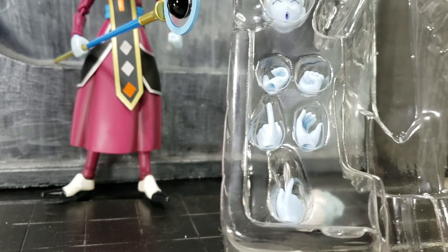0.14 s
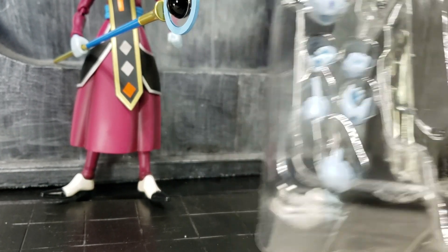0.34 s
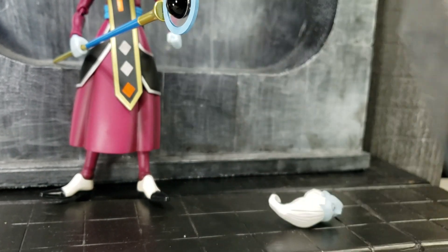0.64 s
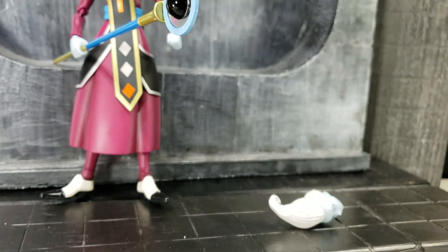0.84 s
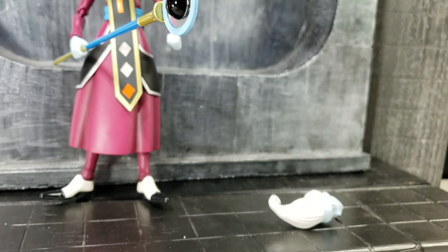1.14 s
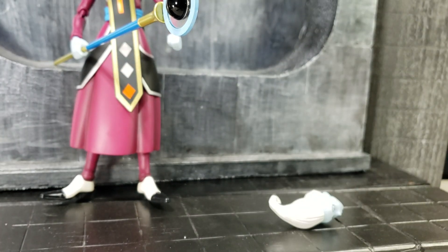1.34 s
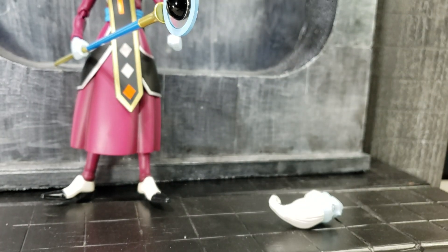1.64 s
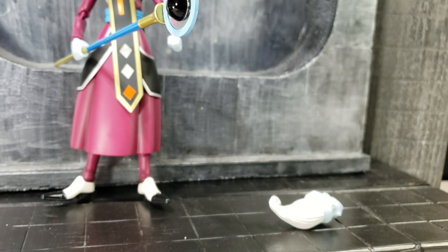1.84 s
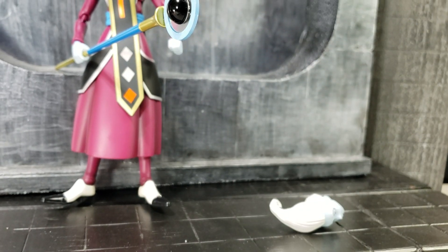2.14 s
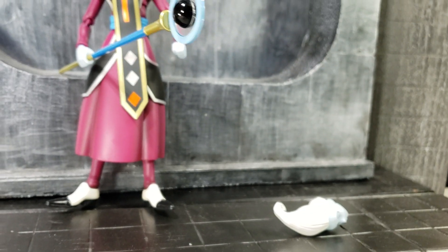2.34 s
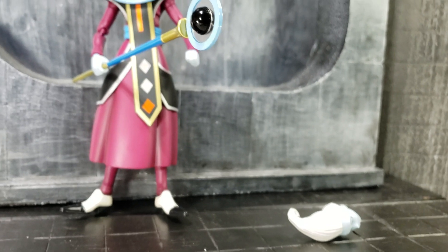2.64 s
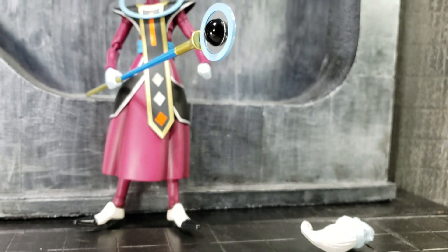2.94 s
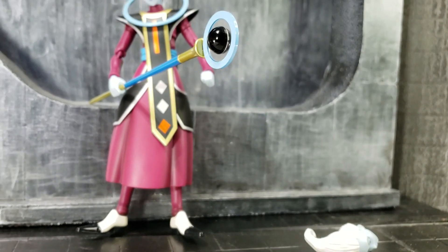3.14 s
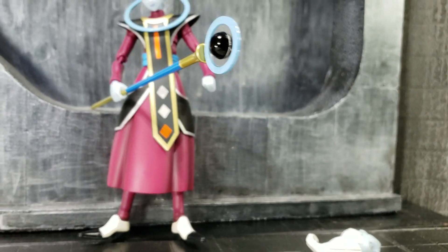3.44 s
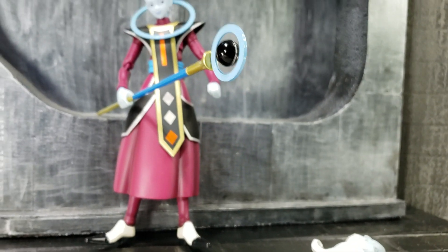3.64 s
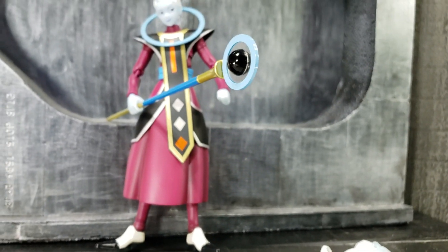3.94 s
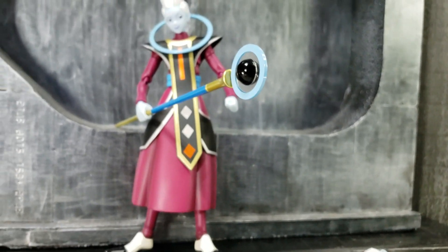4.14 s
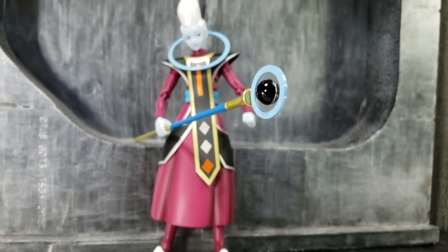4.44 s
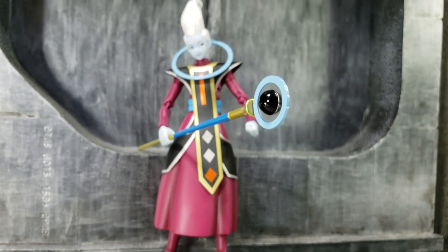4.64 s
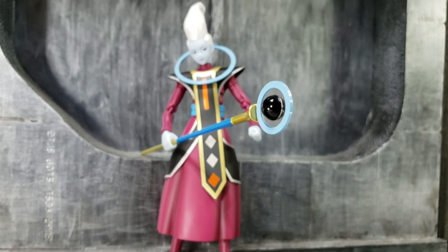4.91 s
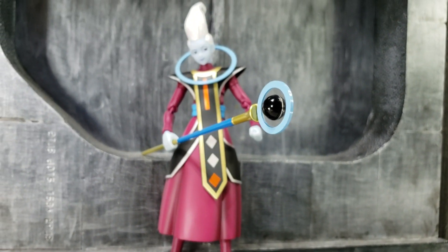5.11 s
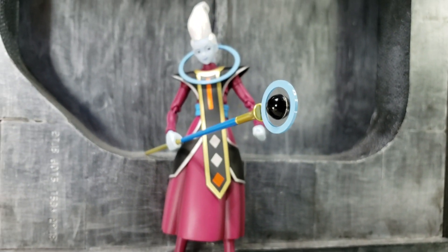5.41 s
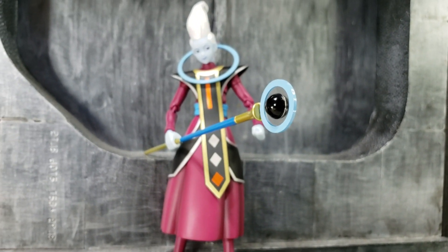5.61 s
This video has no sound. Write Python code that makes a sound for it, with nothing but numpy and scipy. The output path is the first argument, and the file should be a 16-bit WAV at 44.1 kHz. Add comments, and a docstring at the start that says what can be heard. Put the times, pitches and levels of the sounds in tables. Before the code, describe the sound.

In a small quiet room, a thin plastic tray snaps and crinkles as it is lifted and put down a little to the right. Then the camera is picked up: fingers tick, rub and faintly squeak on its case, and the hand bumps it softly, right at the microphone. A sharp tap and one hard knock stand out before the handling fades to a few faint ticks.

```python
"""A plastic blister tray snaps and crinkles as it is lifted and put down on a table to the right:
the thin sheet buckles and rings its pockets. Then a camera is picked up. Fingers tick, rub and squeak
on its case, the hand bumps it, and one hard knock rings it in its holder, close to its two microphone
ports. The small room is quiet."""
import sys
import numpy as np
from scipy import signal
from scipy.fft import rfft, irfft
from scipy.io import wavfile

SR = 44100
rng = np.random.default_rng(int(sys.argv[2]) if len(sys.argv) > 2 else 0)


def to_wav(sig):
    """Store sig (one row per channel, or 1-D mono) as 16-bit WAV at the path in sys.argv[1].

    Samples outside -1..1 are clipped; the rate is SR.
    """
    pcm = np.clip(np.atleast_2d(sig), -1, 1) * 32767
    pcm = np.round(pcm).astype(np.int16)
    wavfile.write(sys.argv[1], SR, pcm.T)  # frames by channels


N = 254266
TIME = np.arange(N) / SR

# grip firmness, as its steady rub: t/s, level/dB
GRIP_CURVE = [(2.25, -100), (2.43, -66), (2.57, -72), (2.61, -84.5), (3.08, -76.5), (3.48, -67.5),
              (3.67, -67.5), (4.35, -63), (4.87, -81.5), (5.77, -97.5)]
# top treble of a hard contact: f/Hz, density/dB
SPARKLE_SPECTRUM = [(5000, -32.5), (8500, -14.5), (10500, -4), (13000, 0.5), (16000, -0.5)]


def tray():
    """Snaps and crinkling shake the thin sheet and ring its pockets, which retune as it bends."""
    # buckles and touchdowns: t/s, level/dB, scatter t60/s, pocket ring/dB
    snaps = [(0.674, -49, 0.04, -6), (0.698, -58.5, 0.039, 4), (0.871, -74, .046, 13),
             (0.941, -49, .1, -14), (0.982, -62, 0.2, 13.5), (1.1591, -34, 0.042, 0),
             (1.166, -31.5, .11, -11), (1.178, -37, .05, -12), (1.204, -45.5, 0.026, -9),
             (1.313, -54, .05, 20.5), (1.345, -43, 0.08, 9), (1.387, -28.5, 0.077, 8),
             (1.400, -33.5, 0.13, 4), (1.429, -35.5, .06, 1.5), (1.470, -39.5, 0.078, 5),
             (1.508, -50.5, 0.032, -13), (1.680, -41, 0.097, -35), (1.724, -27, 0.033, 1),
             (1.733, -23.5, 0.038, -20), (1.761, -31.5, 0.1, 6.5), (1.8234, -31, 0.026, 5),
             (1.884, -33.5, 0.035, 10), (1.902, -37, 0.032, 5), (2.1293, -55.5, 0.11, 5)]
    # pocket modes: f/Hz, level/dB, t60/s, left-right/dB
    pockets = [(456, -48.5, .09, -1), (618, -46.5, 0.066, -3), (656.5, -46, 0.12, 9.5),
               (756, -56, 0.048, -10), (843, -37.5, 0.068, 1), (1090, -49, 0.043, 2),
               (1300, -42, 0.043, -12.5), (1577, -46, 0.054, -15), (2760, -50, 0.045, 14)]
    # sheet response: f/Hz, density/dB
    sheet_spectrum = [(60, -3.5), (140, 1.5), (270, -14.5), (450, -2.5), (850, -4.5), (1250, -4.5),
                      (1800, -11.5), (2800, -13.5), (4500, -20.5), (7300, -27.5), (8500, -37.5),
                      (10500, -34), (13300, -34), (16000, -37.5)]
    # room decay: f/Hz, t60/s
    room_t60 = [(100, 0.39), (500, 0.12), (2000, 0.1), (6000, 0.15), (16000, 0.21)]
    crinkle_db, settle_db_per_s = -16.5, 371
    flex = sliding()
    for s, db, _, _ in snaps:
        add(flex, s, amp(db + crinkle_db - settle_db_per_s * TIME[:SR // 2]))
    crinkle = flex * grains(per_s=3300, spread_db=2) * noise(alike=0.068)
    force = crinkle + amp(-2) * convolve(crinkle, ring(pockets))
    for s, db, t60_s, pocket_db in snaps:
        snap = amp(db + 22.5) * burst(t60_s, alike=0.023)
        bent_pockets = ring(pockets, detune=0.13)
        add(force, s, snap)
        add(force, s, amp(pocket_db - 2) * convolve(snap, bent_pockets))
    sheet = ports(colour(force, sheet_spectrum), apart_hz=1540)
    sheet = left_later(sheet, samples=15)
    return pan(-1.55) * (sheet + amp(-9) * reverb(sheet, room_t60, gap_s=0.0063))


def sliding():
    """Friction envelope of the tray on the table."""
    # pushes: peak t/s, rise/s, fade/s, level/dB
    slides = [(1.17, .006, 0.082, -50), (1.392, 0.041, 0.05, -41), (1.691, 0.048, 0.12, -61.5)]
    return sum(amp(db) * swell(s, rise_s, fade_s) for s, rise_s, fade_s, db in slides)


def knock(at_s=4.4397, db=-9):
    """One hard contact rings the camera and its holder and cracks beside the left port."""
    # camera in its holder: f/Hz, level/dB, t60/s, left-right/dB
    holder_modes = [(68, -22, 0.27, 1), (111, -8.5, 0.17, 2), (160, -5, 0.045, 3), (211, -2.5, .10, 0.5),
                    (315, -7, 0.03, -2.5), (458, -9, 0.046, -2), (675, -4.5, 0.018, -7.5),
                    (925, -3.5, 0.022, -5.5), (1030, -8.5, 0.035, -2.5), (1150, -4, 0.02, -7),
                    (1686, -16, .028, -10.5), (2250, -20, .03, 1), (2725, -9.5, 0.026, 10.5),
                    (3010, -5, 0.021, 5), (5820, -17, 0.028, 4), (6324, -19, 0.028, 6.5)]
    # crack of the knock: f/Hz, density/dB
    crack_spectrum = [(400, -9), (1000, -5), (1500, -13), (2100, -6), (2900, -0.5), (3500, -12.5),
                      (5000, -11.5), (6200, -5), (8500, -23.5), (16000, -28.5)]
    body, crack, sparkle = np.zeros((3, 2, N))
    add(body, at_s, amp(db) * ring(holder_modes))
    add(crack, at_s, amp(db + 14.5) * burst(t60_s=0.023, alike=0.29))
    add(sparkle, at_s, amp(db + 3.5) * burst(t60_s=0.0088, alike=0.05))
    return body + pan(6) * colour(crack, crack_spectrum) + pan(12) * colour(sparkle, SPARKLE_SPECTRUM)


def ticks():
    """Fingers ring the case; a harder touch adds crack and, faster still, sparkle."""
    # finger contacts: t/s, level/dB, f/Hz, hardness/dB
    touches = [(0.199, -64.5, 616, -15), (0.283, -60.5, 633, -26), (0.334, -63, 554, -8),
               (2.441, -25, 790, -8.5), (2.563, -44, 670, -21), (2.944, -43, 395, -10.5),
               (3.176, -54.5, 600, 1), (3.245, -51, 740, -22), (3.272, -53.5, 850, -23),
               (3.405, -46.5, 1100, -10), (3.433, -46.5, 450, -23), (3.753, -26.5, 545, -26),
               (3.776, -42, 573, -30), (3.828, -35.5, 526, -36), (3.893, -45.5, 444, -28),
               (4.058, -40.5, 750, -38), (4.143, -13.5, 673, -8), (4.255, -43, 408, -17),
               (4.288, -28, 505, -25.5), (4.338, -44.5, 680, -20), (4.421, -41.5, 700, -14),
               (4.543, -42.5, 433, -26), (4.65, -43.5, 484, -37), (4.694, -44, 458, -35),
               (4.796, -56, 636, -3), (4.919, -51.5, 1293, -10), (5.064, -44.5, 613, -40),
               (5.374, -75.5, 1228, 27.5), (5.435, -57.5, 673, -15), (5.621, -64, 484, -3.5)]
    # case modes: ratio to the contact's f, level/dB, t60/s, left-right/dB
    case_modes = [(.75, -6.5, .02, 5.5), (.97, 0.5, 0.023, -4), (1.25, -1, 0.012, -3.5),
                  (1.85, -5.5, 0.0085, -12), (3.3, -21, 0.014, -22.5)]
    # crack of a tick: f/Hz, density/dB
    crack_spectrum = [(500, -18), (1200, 7), (2700, 5.5), (4300, -4), (6500, 3.5), (8500, -13.5),
                      (16000, -28.5)]
    body, crack, sparkle = np.zeros((3, 2, N))
    for s, db, hz, hardness_db in touches + faint_ticks():
        add(body, s, amp(db - 1.5) * ring(case_modes, detune=0.01, pitch=hz, size=2048))
        add(crack, s, amp(db + hardness_db + 17.5) * burst(t60_s=0.02, alike=0.38, size=2048))
        add(sparkle, s, amp(db + 1.6 * hardness_db + 14.5) * burst(t60_s=0.0034, alike=0.049, size=512))
    soft = butter(body, 2, [300, 2200], "band")
    return soft + pan(-1.3) * colour(crack, crack_spectrum) + pan(1.2) * colour(sparkle, SPARKLE_SPECTRUM)


def faint_ticks(per_s=14, offset_db=14, spread_db=2.5, hz=630, hardness_db=-18, count=120):
    """Random slips of the holding fingers, as contact rows; their level follows the grip."""
    start_s, grip = GRIP_CURVE[0][0], grip_db()
    times = start_s + np.cumsum(rng.exponential(1, count)) / per_s
    return [(s, grip[int(s * SR)] + offset_db + spread_db * force, hz * np.exp(0.3 * place), hardness_db)
            for s, (force, place) in zip(times, rng.standard_normal((count, 2))) if s < TIME[-1]]


def fingers():
    """Skin drags on the case: grainy rub and fine hiss follow the grip and swell with each stroke."""
    # fingertip slides: peak t/s, rise/s, fade/s, rub/dB, hiss/dB
    strokes = [(2.437, 0.0088, 0.014, -42, -58), (2.47, 0.014, 0.1, -47, -53.5),
               (2.722, 0.0086, 0.01, -44.5, -38), (2.761, 0.014, 0.1, -55, -63.5),
               (2.976, 0.016, 0.027, -53.5, -54.5), (3.12, 0.021, 0.078, -78, -60),
               (3.567, 0.015, 0.047, -46.5, -64), (3.59, 0.092, .11, -72, -62),
               (3.745, 0.019, 0.054, -51.5, -94), (4.015, 0.014, 0.023, -54.5, -59),
               (4.119, 0.0083, 0.019, -43, -41.5), (4.29, 0.044, 0.071, -58, -64),
               (4.7, 0.02, 0.086, -68.5, -89), (5.402, 0.025, 0.032, -65, -75)]
    # coarse and fine skin friction: f/Hz, density/dB
    rub_spectrum = [(100, -39), (170, 0), (219, 0), (264, 0.5), (355, -9), (403, -15), (505, -6),
                    (590, -5.5), (762, -8), (928, -16), (1230, -5.5), (2050, -24.5), (2800, -23.5),
                    (3360, -27), (5000, -30), (6500, -60.5), (11000, -120)]
    hiss_spectrum = [(2000, -9), (3000, -3.5), (4400, -9.5), (5600, -3), (6700, 0.5), (8400, -21.5),
                     (10500, -8), (12500, -5), (15500, -4)]
    rub_gain, hiss_gain = amp(grip_db()), amp(grip_db() - 12)
    for s, rise_s, fade_s, rub_db, hiss_db in strokes:
        pressure = swell(s, rise_s, fade_s)
        rub_gain += amp(rub_db) * pressure
        hiss_gain += amp(hiss_db) * pressure
    coarse = grains(per_s=1500, spread_db=1) * noise(alike=0.033)
    coarse = skin_resonances(coarse, low_hz=130, high_hz=5500, spread_db=2, count=20)
    fine = grains(per_s=10000, spread_db=0.5) * noise(alike=0.13)
    fine = skin_resonances(fine, low_hz=1400, high_hz=16000, spread_db=4, count=26)
    rub = colour(rub_gain * amp(-2.5) * coarse, rub_spectrum)
    hiss = colour(hiss_gain * amp(-0.1) * fine, hiss_spectrum)
    return pan(-3) * ports(rub, apart_hz=900) + pan(2.5) * hiss


def skin_resonances(x, low_hz, high_hz, spread_db, count, per_s=14):
    """Resonances swell and fade at random as the patch of skin in contact changes; rms 1."""
    out, centres_hz = 0, np.geomspace(low_hz, high_hz, count)
    q = 1 / np.log(centres_hz[1] / centres_hz[0])
    for k, (hz, draws) in enumerate(zip(centres_hz, rng.standard_normal((count, 512)))):
        drift = np.interp(TIME[::64] * per_s + k / count, np.arange(len(draws)), draws)
        gain = np.repeat(amp(spread_db * drift), 64)[:N]
        out = out + (-1) ** k * gain * signal.lfilter(*signal.iirpeak(hz, q, fs=SR), x + 1e-18)
    return rms_one(out)


def grip_db():
    """Grip firmness per sample; negligible before the hand arrives."""
    return np.interp(TIME, *np.transpose(GRIP_CURVE), left=-120)


def squeaks(relative_width=0.15, size=32768):
    """Skin or plastic sticks and slips: friction noise in one narrow resonance per squeak."""
    # squeaks: centre t/s, half length/s, f/Hz, level/dB, left-right/dB
    slips = [(1.6, .063, 1600, -84, -17), (1.629, 0.065, 3320, -79, -15), (2.544, .04, 2780, -61, 3),
             (2.647, .061, 2380, -66, 4), (2.609, 0.061, 6370, -71, 8), (2.724, 0.0062, 1156, -47.5, -13),
             (2.734, 0.0072, 12700, -48, 13), (2.799, 0.043, 2670, -67, -7),
             (3.103, 0.0089, 11860, -64.5, -18), (3.116, .018, 6800, -67, -6),
             (3.14, 0.0093, 12800, -60, -19), (3.216, .024, 11900, -72, -20),
             (3.475, 0.055, 6050, -69.5, 5), (3.623, 0.012, 5300, -62, 5), (4.021, 0.019, 5760, -57, 7.5),
             (4.104, 0.0077, 6200, -54, 7), (4.115, 0.012, 531, -40, -8), (4.123, 0.018, 1154, -46.5, -12),
             (5.38, 0.11, 6530, -81.5, 8)]
    out, t = np.zeros((2, N)), (np.arange(size) - size / 2) / SR
    for s, half_s, hz, db, side_db in slips:
        band_hz = [hz * (1 - relative_width / 2), hz * (1 + relative_width / 2)]
        tone = rms_one(butter(noise(alike=0.3, size=size), 2, band_hz, "band"))
        add(out, s + t[0], amp(db) * pan(side_db) * tone * np.exp(-0.5 * (t / half_s) ** 2))
    return out


def bumps():
    """The soft hand excites only the lowest modes of the case."""
    # hand contacts: t/s, level/dB
    contacts = [(1.793, -38), (2.132, -42), (2.452, -38.5), (2.471, -28), (2.486, -29), (2.501, -41),
                (2.741, -38.5), (2.755, -36), (2.982, -40), (3.56, -34), (3.689, -35), (4.78, -43),
                (5.276, -54), (5.647, -44)]
    # low case modes: f/Hz, level/dB, t60/s, left-right/dB
    thud_modes = [(66, -13, 0.15, 10), (105, -5, 0.16, 5.5), (134.5, 1.5, 0.039, -3),
                  (208.3, -5, 0.15, 1.5)]
    out = np.zeros((2, N))
    for s, db in contacts:
        add(out, s, amp(db - 3.5) * ring(thud_modes, detune=0.014))
    return out


def rumble():
    """The hand trembles, more with a firm grip; the table rumbles under the sliding tray."""
    # hand and table rumble: f/Hz, density/dB
    spectrum = [(15, -37), (25, -5.5), (48, 7), (113, 5.5), (156, -4), (216, -10.5), (273, -12.5),
                (356, -17.5), (400, -23.5), (520, -47), (880, -120)]
    tremor = amp(0.42 * grip_db() - 24.5)
    table = amp(-12) * sliding()
    return colour((tremor + table) * noise(alike=0.7), spectrum)


def room_air(db=-69):
    """Faint steady noise, strongest in the bass."""
    # room noise: f/Hz, density/dB
    spectrum = [(15, -36), (25, -6), (53, -1.5), (80, -1.5), (145, -7), (190, -16), (394, -28.5),
                (531, -27.5), (3720, -35), (7310, -39), (8140, -48.5), (12200, -35.5), (16000, -35.5)]
    return amp(db) * colour(noise(alike=0.12), spectrum)


def amp(db):
    return 10 ** (np.asarray(db) / 20)


def rms_one(x):
    return x / np.sqrt(np.mean(x ** 2) + 1e-20)


def at_hz(points, hz):
    """Interpolate a table over log frequency."""
    table_hz, values = np.transpose(points)
    return np.interp(np.log(hz + 1), np.log(table_hz), values)


def pan(left_right_db):
    return amp(np.array([[left_right_db], [-left_right_db]]) / 2)


def add(track, at_s, sound):
    start = int(at_s * SR)
    track[..., start:start + sound.shape[-1]] += sound[..., :N - start]


def butter(x, order, hz, kind):
    return signal.sosfilt(signal.butter(order, hz, kind, fs=SR, output="sos"), x)


def convolve(x, response):
    return signal.fftconvolve(np.atleast_2d(x), np.atleast_2d(response), axes=1)[:, :N]


def colour(x, spectrum, size=4096):
    """Minimum-phase filter of unit energy with the given spectrum."""
    cepstrum = irfft(np.log(amp(at_hz(spectrum, np.fft.rfftfreq(size, 1 / SR)))))
    response = irfft(np.exp(rfft(2 * cepstrum[:size // 2], size)))
    return convolve(x, response / np.linalg.norm(response))


def noise(alike, size=N):
    """Stereo white noise; alike is the channel correlation."""
    white = rng.standard_normal((3, size))
    return np.sqrt(alike) * white[0] + np.sqrt(1 - alike) * white[1:]


def grains(per_s, spread_db):
    """Tiny random slips of uneven size; rms 1."""
    sizes = amp(spread_db * np.minimum(rng.exponential(1, N), 4))
    return rms_one((rng.random(N) < per_s / SR) * sizes)


def burst(t60_s, alike, size=8192):
    """A click scattered into dying noise; unit energy per channel."""
    x = noise(alike, size) * amp(-60 * np.arange(size) / SR / t60_s)
    return x / np.linalg.norm(x, axis=1, keepdims=True)


def ring(modes, detune=0, pitch=1, size=12000):
    """Struck modes in stereo; random detuning stands for the place of contact."""
    out, t = 0, np.arange(size) / SR
    for k, (frequency, db, t60_s, side_db) in enumerate(modes):
        hz = pitch * frequency * np.exp(detune * rng.standard_normal())
        out = out + (-1) ** k * pan(side_db) * amp(db - 60 * t / t60_s) * np.sin(2 * np.pi * hz * t)
    return out


def swell(peak_s, rise_s, fade_s):
    """Pressure of one push: Gaussian rise, exponential fade."""
    late_s = TIME - peak_s
    exponent = np.where(late_s < 0, 0.5 * (late_s / rise_s) ** 2, late_s / fade_s)
    return np.exp(-np.minimum(exponent, 20))


def reverb(x, t60s, gap_s, size=20000):
    """Diffuse reflections build up over gap_s and die band by band."""
    response, t = 0, np.arange(size) / SR
    edges_hz = np.geomspace(60, 17000, 10)
    for low, high in zip(edges_hz, edges_hz[1:]):
        band = butter(rng.standard_normal((2, size)), 2, [low, high], "band")
        response = response + band * amp(-60 * t / at_hz(t60s, np.sqrt(low * high)))
    response *= 1 - np.exp(-(t / gap_s) ** 2)
    return convolve(x, response / np.linalg.norm(response[0]))


def ports(x, apart_hz):
    """Long waves reach both ports alike; only short ones differ."""
    side = butter((x[0] - x[1]) / 2, 1, apart_hz, "high")
    return x.mean(axis=0) + side * [[1], [-1]]


def left_later(x, samples):
    """The sound reaches the left port later."""
    return np.array([np.roll(x[0], samples), x[1]])


def scene():
    """Tray, handling and air; knock, ticks and friction also echo, duller, in the nook round the camera."""
    # nook decay: f/Hz, t60/s
    nook_t60 = [(100, 0.2), (1000, 0.14), (6000, 0.14), (11000, 0.18), (16000, 0.031)]
    mix = room_air() + rumble() + bumps() + tray()
    blow, friction, taps = knock(), fingers() + squeaks(), ticks()
    send = amp(-12) * taps + amp(-9) * blow + amp(-9.5) * friction
    nook = butter(reverb(send, nook_t60, gap_s=0.0013), 1, 9000, "low")
    return mix + left_later(taps + blow, samples=3) + friction + nook


def record(dry):
    """High-pass at 36 Hz, soft peak limit, steep low-pass at 16 kHz."""
    thin = butter(dry, 4, 36, "high")
    rounded = 0.9 * np.tanh(thin / 0.9)
    return signal.sosfilt(signal.ellip(10, 0.2, 70, 16000, fs=SR, output="sos"), rounded)


dry = scene()
out = record(dry)
to_wav(out)
```